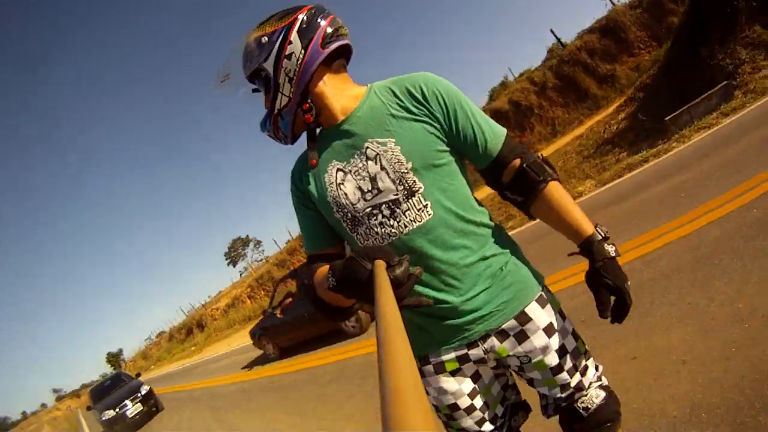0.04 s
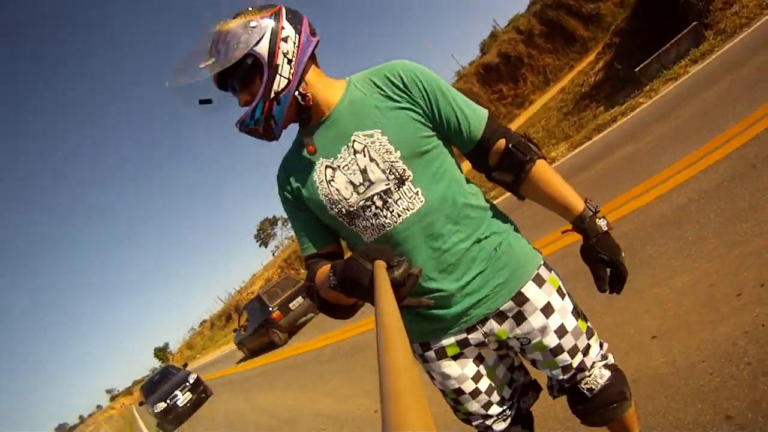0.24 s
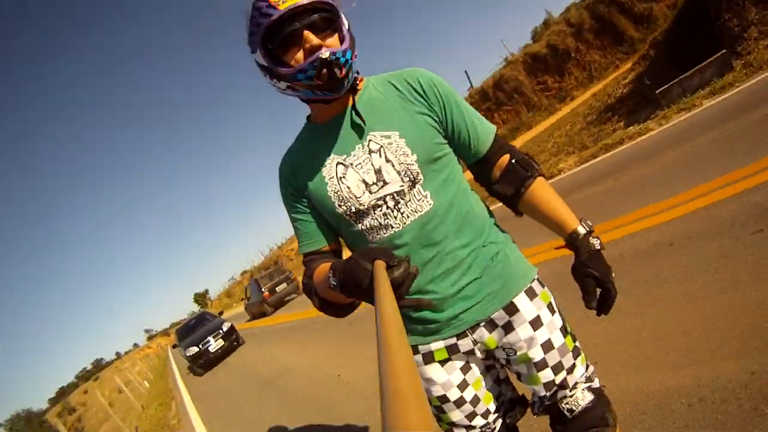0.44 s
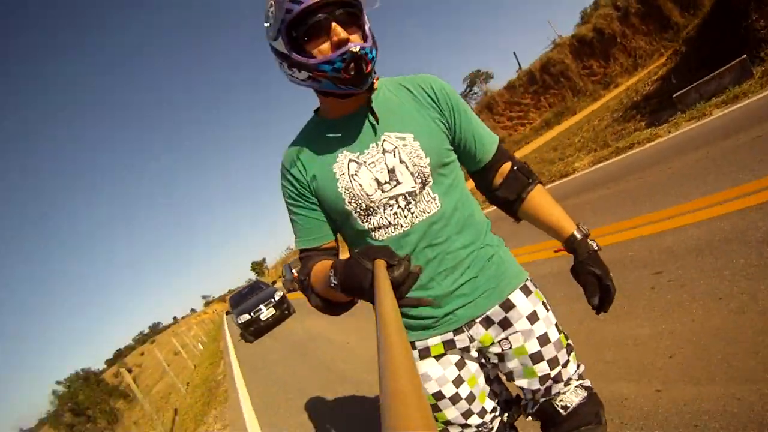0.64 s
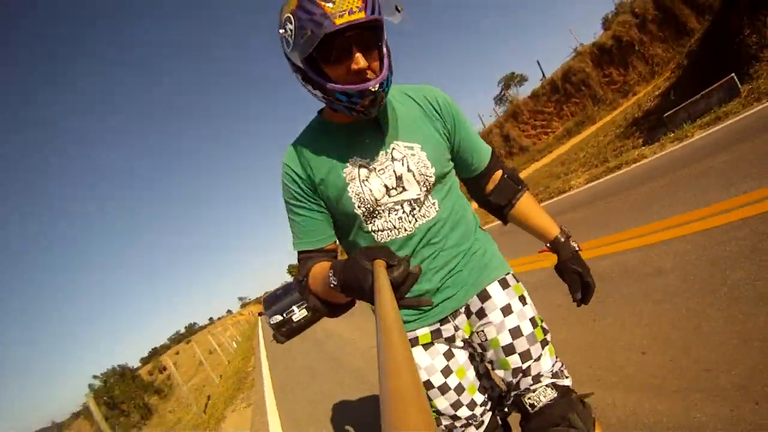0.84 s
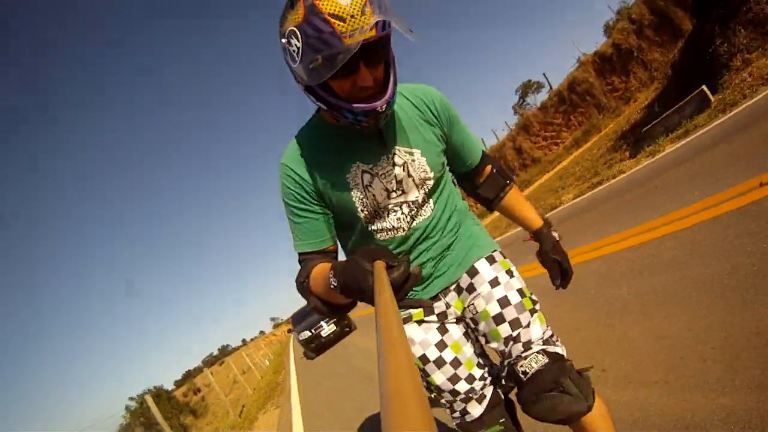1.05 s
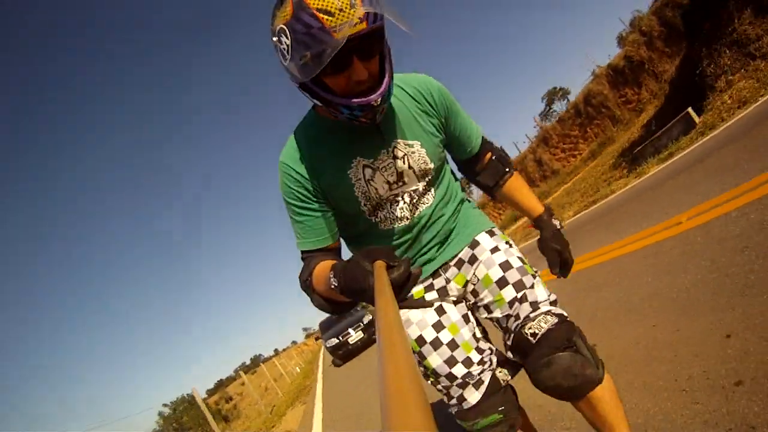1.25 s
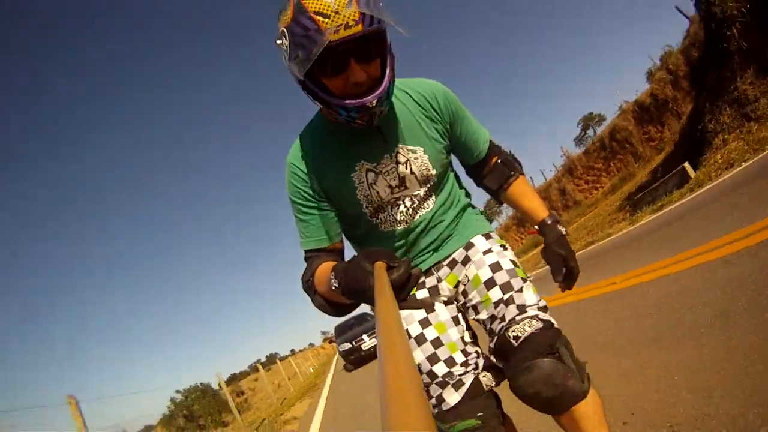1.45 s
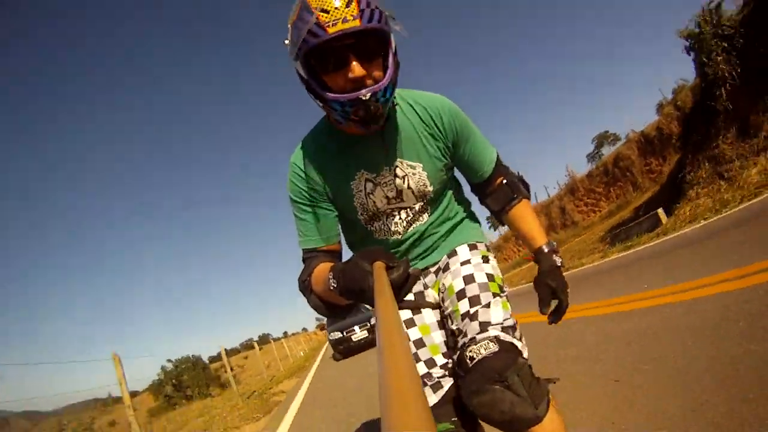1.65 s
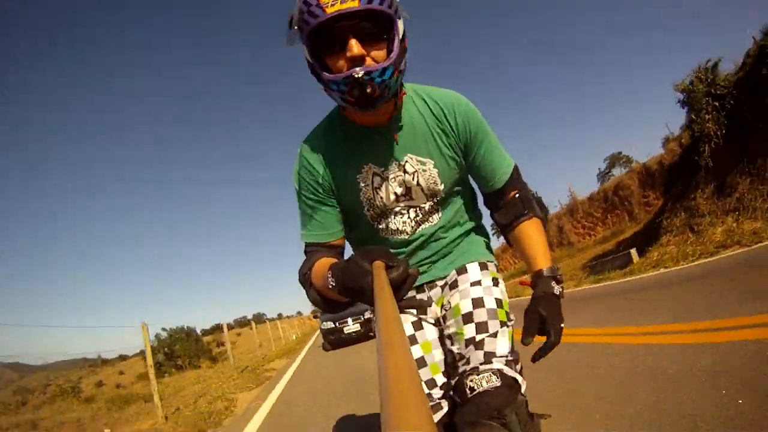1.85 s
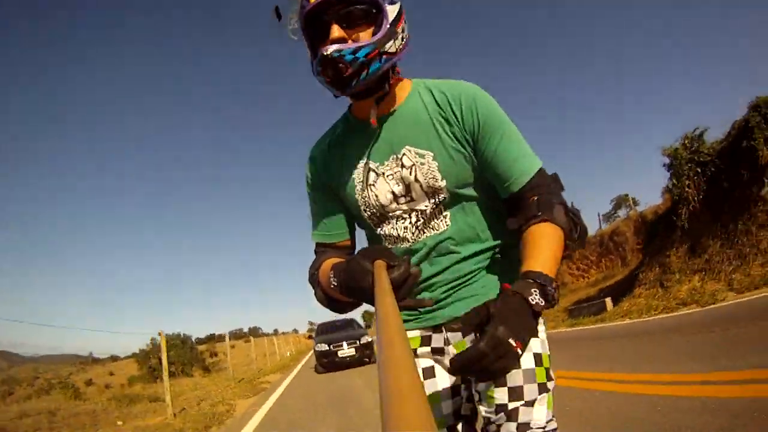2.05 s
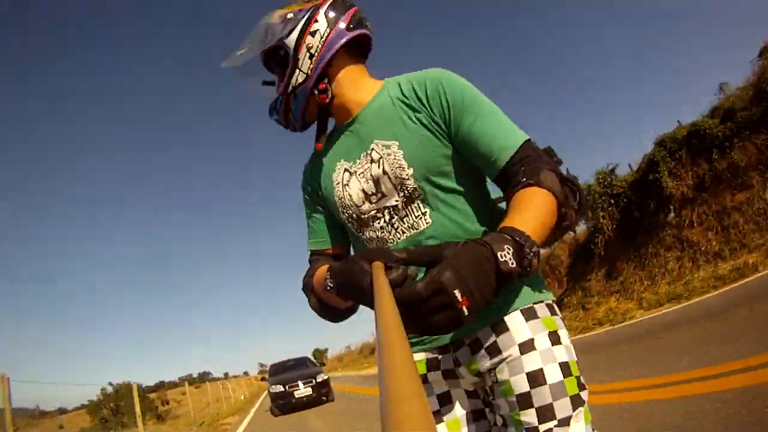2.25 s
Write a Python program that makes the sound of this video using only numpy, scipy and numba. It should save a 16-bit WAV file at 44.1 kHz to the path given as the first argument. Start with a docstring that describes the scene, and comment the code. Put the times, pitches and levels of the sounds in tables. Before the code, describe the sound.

Skateboard wheels roll on asphalt with one hard knock, wind and a passing car.

```python
"""A passing car's hiss and one hard knock over the roar of a skateboard rolling on asphalt.
Heard from a cased camera on a hand-held pole: the wheels ring the case and scrub as the board
steers, the pole shudders, wind buffets the case and the car falls behind.
The knock overloads the microphone, ducks the gain and leaves a short rattle."""
import sys
import numpy as np
from scipy import signal
from scipy.fft import rfft, irfft
from scipy.io import wavfile
from scipy.ndimage import uniform_filter1d
from numba import njit

SR = 44100
rng = np.random.default_rng(int(sys.argv[2]) if len(sys.argv) > 2 else 0)


def transcribe(signal):
    """Save signal, clipped to [-1, 1], as a 16-bit WAV file at the path in sys.argv[1]."""
    frames = np.atleast_2d(signal).T
    limited = np.clip(frames, -1, 1)
    pcm = np.round(limited * 32767).astype(np.int16)
    wavfile.write(sys.argv[1], SR, pcm)


N = 101429
T = np.arange(N) / SR


def wheels():
    """Dense grit strikes and smooth roar ring the case."""
    # wheels on asphalt: freq_hz, density_db
    spectrum = [(130, -3.5), (330, -10), (1050, -21), (1500, -13.5), (1850, -18.5), (2700, -19),
                (4200, -29.5), (8000, -33), (13500, -33), (15200, -34)]
    # roar envelope: time_s, level_db
    levels = [(0, -52), (.7, -51.5), (1.0, -53.5), (1.3, -51.5), (1.55, -50), (1.9, -52.5), (2.3, -51)]
    grit_per_s, grit_to_roar, grit_spread_db, flutter_db = 1800, 0.39, 2, 0.56
    strikes = rng.random(N) < grit_per_s / SR
    grit = strikes * rng.standard_normal(N) * undb(grit_spread_db * rng.standard_normal(N))
    drive = grit_to_roar * grit / grit.std() + rng.standard_normal(N)
    roar = case_unit_rms(colour(drive, spectrum))
    return roar * curve(levels) * undb(flutter_db * drift(rate_hz=23.65))


def scrubs():
    """Short rough swells as the wheels slip sideways."""
    # slips: start_s, decay_s, level_db
    slips = [(-.005, 0.01, -26.5), (0.147, 0.072, -38.5), (0.393, 0.063, -42.5), (0.478, 0.092, -47.5),
             (0.639, 0.071, -51)]
    # scrub noise: freq_hz, density_db
    spectrum = [(115, 2), (230, -18), (520, -18), (800, -24.5), (1300, -13.5), (2200, -24), (3200, -37),
                (6000, -53), (10500, -35), (15200, -44.5)]
    rise_s, roughness_db = 0.0085, 1.4
    swell = np.zeros(N)
    for start_s, decay_s, level_db in slips:
        age_s = T - start_s
        swell += undb(level_db) * np.clip(age_s / rise_s, 0, 1) * np.exp(-(age_s / decay_s) ** 2)
    return case_unit_rms(noise(spectrum)) * swell * undb(roughness_db * drift(rate_hz=150))


def knocks():
    """Each blow cracks against the case and rings the mount; longer contact is duller."""
    # one hard blow, one faint: start_s, gain_db, contact_ms
    blows = [(0.2093, 4, 0.019), (2.2429, -53, 0.11)]
    # pole and mount modes: freq_hz, gain_db, t60_s
    modes = [(96.2, -10.5, 0.11), (195.5, -25, 0.0088), (499.7, 13.5, .02), (599, 6.5, 0.028),
             (822, 8.5, 0.01), (1067, 11.5, .012), (1364, 4, 0.014), (1626, 1.5, 0.026), (2018, 10, 0.012),
             (2580, 2.5, 0.02), (3500, -12.5, .01)]
    # contact crack: freq_hz, density_db
    spectrum = [(800, 7), (2400, -7), (3800, 6), (5200, -6), (7500, -10), (10200, 13), (11500, 6.5),
                (12000, -15.5), (13500, 7.5), (15000, -21)]
    crack_gain_db, window_s = -7.5, 0.1
    crack_noise = undb(crack_gain_db) * noise(spectrum)
    out = np.zeros(N)
    for start_s, gain_db, contact_ms in blows:
        span = (T >= start_s) & (T < start_s + window_s)
        age_s = T[span] - start_s
        mount = sum((-1) ** k * undb(db) * decay(age_s, t60_s) * np.sin(2 * np.pi * hz * age_s)
                    for k, (hz, db, t60_s) in enumerate(modes))
        crack = case(crack_noise[span] * decay(age_s, t60_s=0.015))
        softness = np.exp(-1000 / (SR * contact_ms))  # one-pole low-pass
        out[span] += undb(gain_db) * signal.lfilter([1 - softness], [1, -softness], mount + crack)
    return out


def rattle():
    """Loose parts tick in the case after the knocks."""
    # ticks: start_s, gain_db
    ticks = [(0.248, -33), (.2690, -28), (0.2769, -31.5), (2.2445, -48.5)]
    # tick noise: freq_hz, density_db
    spectrum = [(500, -23), (800, -19), (1200, 8.5), (2200, -9.5), (3500, -8.5), (5000, -22.5), (8000, -24),
                (10000, -16.5), (12000, -22), (14500, -19)]
    envelope = sum(undb(db) * decay(T - start_s, t60_s=0.012) for start_s, db in ticks)
    return case(noise(spectrum) * envelope)


def pole():
    """The pole shudders at its bending mode and takes two soft jolts."""
    # shudder envelope: time_s, level_db
    levels = [(0.0, -34.5), (0.19, -42.5), (0.23, -30.5), (0.3, -29), (0.44, -32), (0.59, -45), (0.64, -31),
              (0.95, -42.5), (1.03, -28), (1.1, -39), (1.52, -31), (1.57, -45), (1.65, -30), (1.8, -27.5),
              (1.89, -58.5), (1.94, -39.5), (2.26, -40), (2.3, -43)]
    # jolts: centre_s, peak_db, freq_hz, half_width_s
    jolts = [(0.248, -27, 80, .03), (2.248, -29.5, 63, 0.0068)]
    bending_hz, waver_ratio = 29.7, 0.0618
    cycles = np.cumsum(bending_hz * (1 + waver_ratio * drift(rate_hz=7.9))) / SR
    out = np.sqrt(2) * curve(levels) * np.sin(2 * np.pi * cycles)
    for centre_s, peak_db, freq_hz, half_width_s in jolts:
        envelope = undb(peak_db) * np.exp(-((T - centre_s) / half_width_s) ** 2)
        out -= envelope * np.cos(2 * np.pi * freq_hz * (T - centre_s))
    return out


def wind():
    """Low gusts buffet the case."""
    # buffeting: freq_hz, density_db
    spectrum = [(15, -11.5), (35, 1.5), (60, -8.5), (100, -8.5), (150, -25.5), (300, -37), (1000, -83)]
    # wind envelope: time_s, level_db
    levels = [(0, -40.5), (.27, -36.5), (.55, -37.5), (.65, -52), (1.0, -46), (1.4, -45), (2.2, -50),
              (2.3, -42)]
    gust_db = 2
    return noise(spectrum) * curve(levels) * undb(gust_db * drift(rate_hz=14))


def car():
    """Tyre hiss and a sagging engine hum fade up the road."""
    # engine partials: firing_multiple, start_level_db
    partials = [(1.5, -49), (2, -52.5), (3, -47.5), (4, -47.5)]
    # tyre hiss: freq_hz, density_db
    spectrum = [(300, 1.5), (800, -24.5), (1400, -2), (2400, -3.5), (3200, -12.5), (5000, -32), (8000, -30),
                (9800, -16.5), (11200, -23.5), (12800, -28), (14300, -17.5), (15200, -25.5)]
    # hiss envelope: time_s, level_db
    levels = [(0, -50.5), (.19, -46), (.37, -46.5), (.46, -52), (.72, -54.5), (.85, -60.5), (1.2, -71.5),
              (2.3, -80.5)]
    firing_hz, sag_hz_per_s, waver_ratio = 68.4, 4, 0.018
    fade_db_per_s, flutter_db = 18.5, 2.46
    pitch_hz = (firing_hz - sag_hz_per_s * T) * (1 + waver_ratio * drift(rate_hz=30))
    cycles = np.cumsum(pitch_hz) / SR
    hum = sum(np.sqrt(2) * undb(db + flutter_db * drift(rate_hz=40)) * np.sin(2 * np.pi * k * cycles)
              for k, db in partials)
    hiss = case_unit_rms(noise(spectrum)) * curve(levels)
    return hum * undb(-fade_db_per_s * T) + hiss


def case(x):
    """Camera case resonances as peaking filters in series."""
    # resonances and one dip: centre_hz, width_hz, gain_db
    peaks = [(225, 96, 7.7), (467, 212, 12.4), (811, 262, 16.6), (2070, 114, 7.3), (2222, 273, 13.1),
             (2979, 150, 8.0), (3471, 160, 8.3), (3694, 258, 9.1), (4662, 484, 11.7), (5215, 357, 8.8),
             (5994, 717, -10.9), (6791, 387, 9.1), (7331, 405, 10.0), (8418, 394, 10.7), (9033, 197, 8.5),
             (9804, 413, 16.5), (11201, 167, 9.7), (11985, 77, 11.2), (12794, 165, 9.4), (14195, 372, 15.0),
             (14975, 166, 7.4)]
    for centre_hz, width_hz, gain_db in peaks:
        tuning = -2 * np.cos(2 * np.pi * centre_hz / SR)
        width, root_gain = np.tan(np.pi * width_hz / SR), np.sqrt(undb(gain_db))
        x = signal.lfilter([1 + width * root_gain, tuning, 1 - width * root_gain],
                           [1 + width / root_gain, tuning, 1 - width / root_gain], x)
    return x


def case_unit_rms(x):
    """Sound through the case, at rms 1."""
    y = case(x)
    return y / y.std()


def undb(db):
    """Decibels to gain."""
    return 10 ** (np.asarray(db) / 20)


def curve(rows):
    """Gain along rows of time_s, level_db."""
    return undb(np.interp(T, *np.array(rows).T))


def drift(rate_hz):
    """Smooth random drift, spread near 1."""
    hold = int(SR / rate_hz)
    steps = np.repeat(rng.standard_normal(N // hold + 1), hold)
    return 1.33 * uniform_filter1d(uniform_filter1d(steps, hold), hold)[:N]


def colour(x, spectrum):
    """Shape by rows of freq_hz, density_db; steep cut below the first row; rms 1."""
    hz, db = np.array(spectrum).T
    bins_hz = np.fft.rfftfreq(N, 1 / SR) + 1e-3
    gain = undb(np.interp(np.log(bins_hz), np.log(hz), db))
    low_cut = np.minimum(bins_hz / hz[0], 1) ** 3
    y = irfft(rfft(x) * gain * low_cut, N)
    return y / y.std()


def noise(spectrum):
    """Coloured noise, rms 1."""
    return colour(rng.standard_normal(N), spectrum)


def decay(age_s, t60_s):
    """Exponential decay from age 0."""
    return (age_s >= 0) * np.exp(-np.log(1000) * np.maximum(age_s, 0) / t60_s)


@njit
def follow(x, attack_s, release_s):
    """Envelope follower."""
    out, level = np.empty(len(x)), 0.
    for i in range(len(x)):
        lag_s = attack_s if abs(x[i]) > level else release_s
        level += (abs(x[i]) - level) / (lag_s * SR)
        out[i] = level
    return out


def scene():
    """Mono sum at the microphone."""
    return (wheels() + scrubs() + car() + pole() + wind() + knocks() + rattle())[None]


def record(dry):
    """Gain control ducks after an overload, peaks clip, the top is cut."""
    threshold_db, duck_db_per_db, clip_hardness, cutoff_hz = -19, 0.62, 5.7, 15300
    envelope = follow(dry[0], attack_s=0.011, release_s=0.065)
    ducked = dry * np.maximum(envelope / undb(threshold_db), 1) ** -duck_db_per_db
    clipped = ducked / (1 + np.abs(ducked) ** clip_hardness) ** (1 / clip_hardness)
    return signal.sosfilt(signal.ellip(8, .2, 70, cutoff_hz, fs=SR, output="sos"), clipped)


dry = scene()
out = record(dry)
transcribe(out)
```